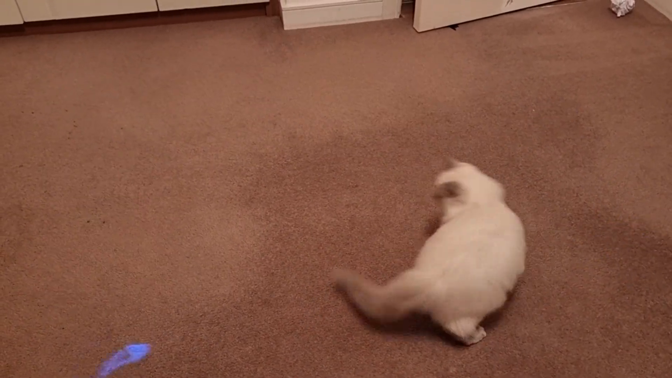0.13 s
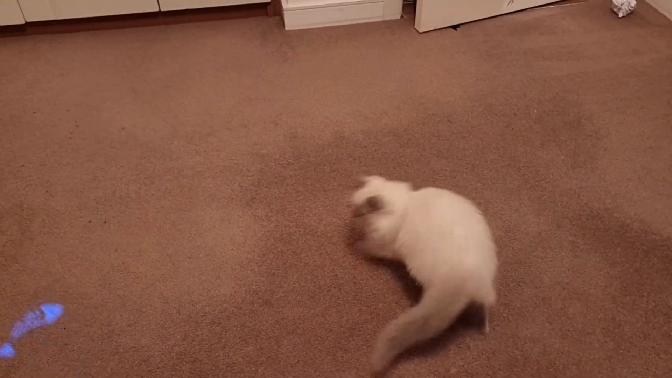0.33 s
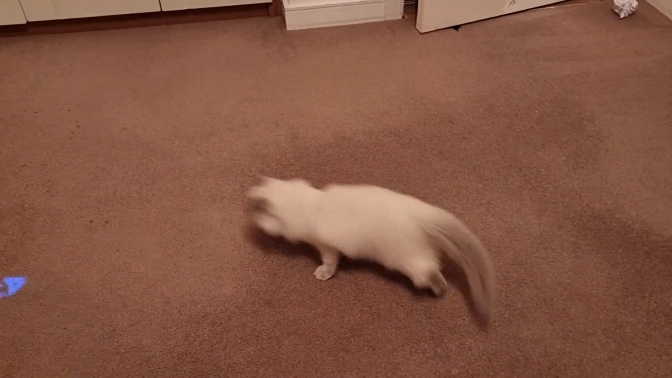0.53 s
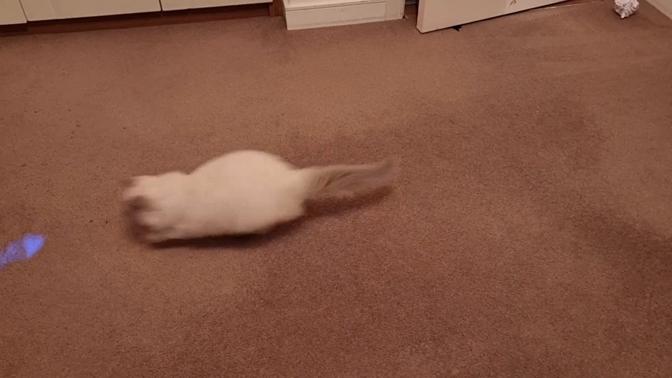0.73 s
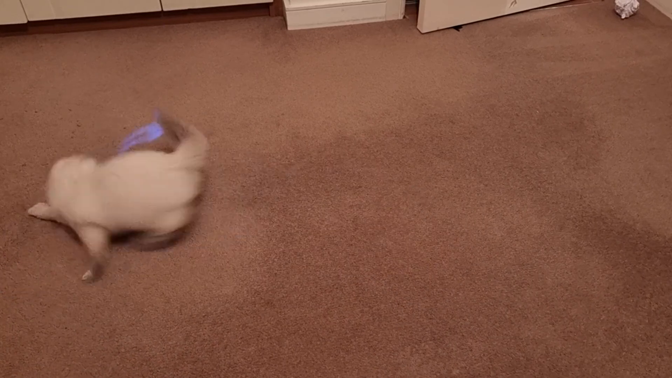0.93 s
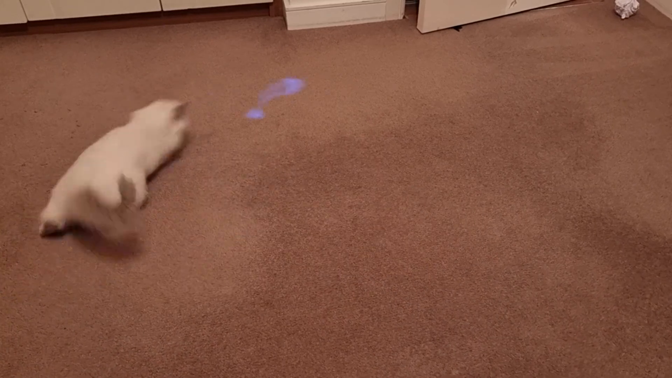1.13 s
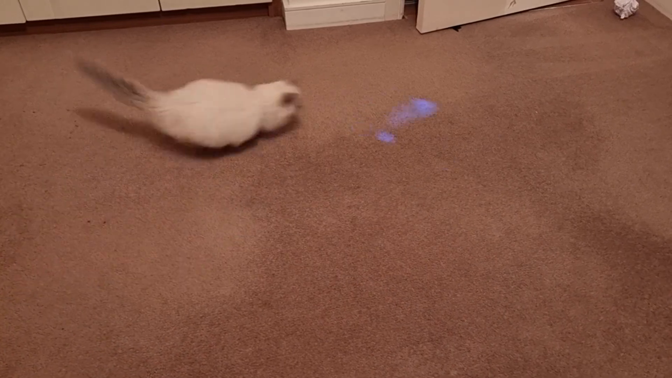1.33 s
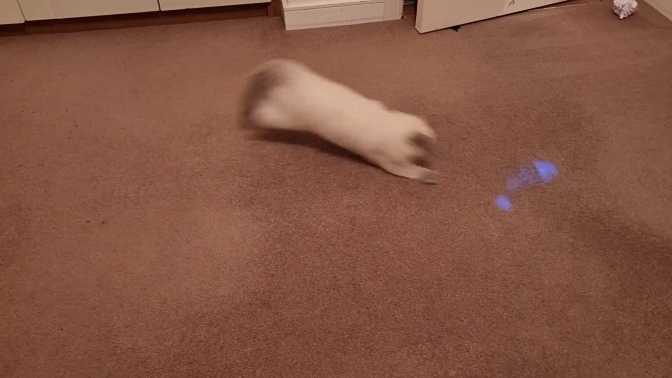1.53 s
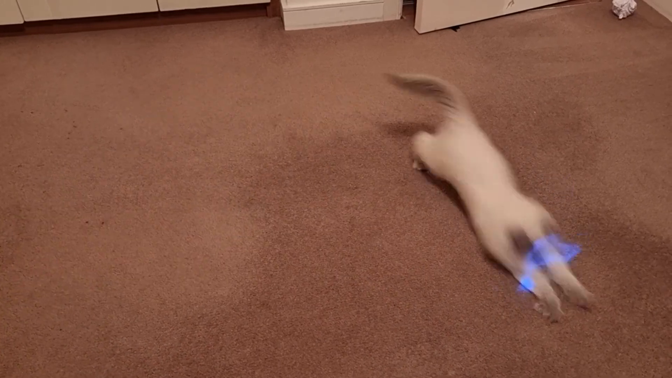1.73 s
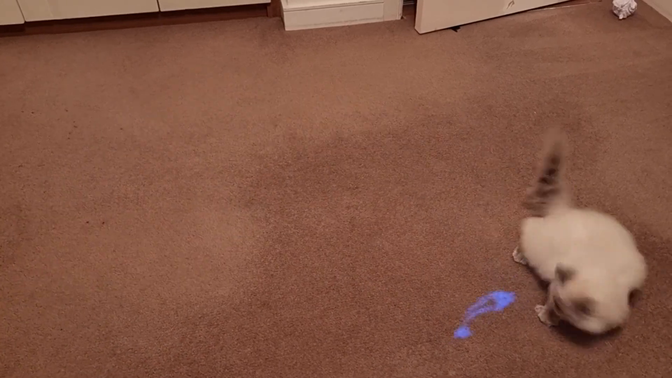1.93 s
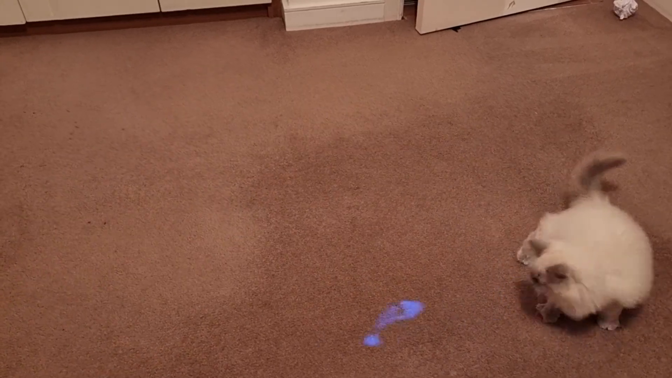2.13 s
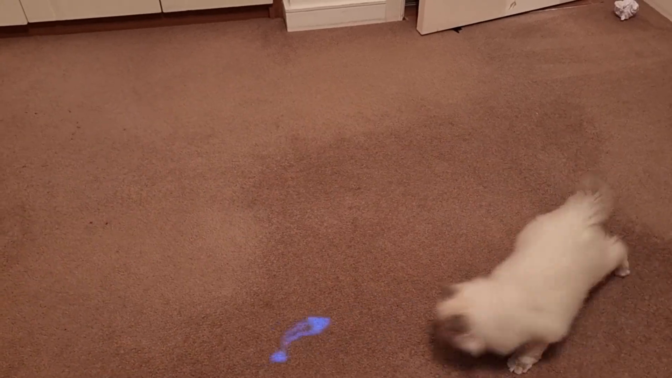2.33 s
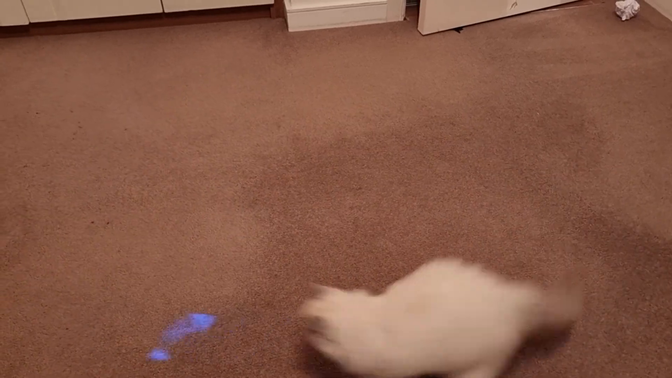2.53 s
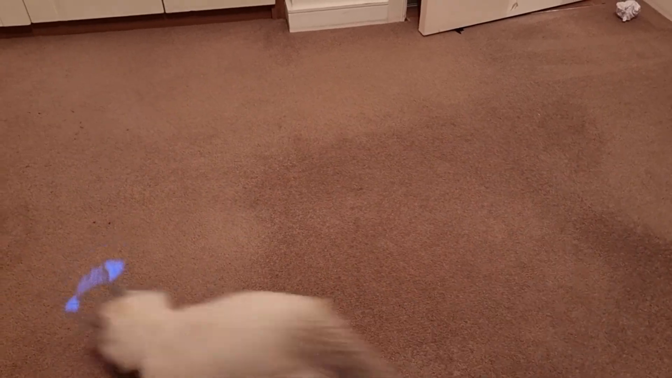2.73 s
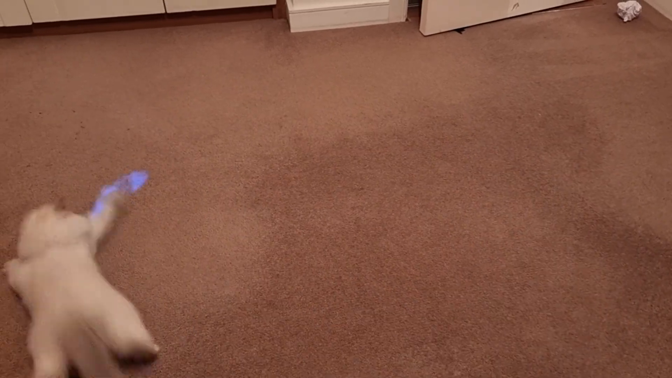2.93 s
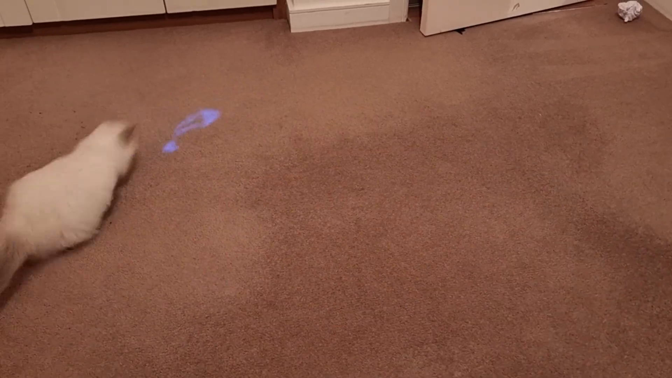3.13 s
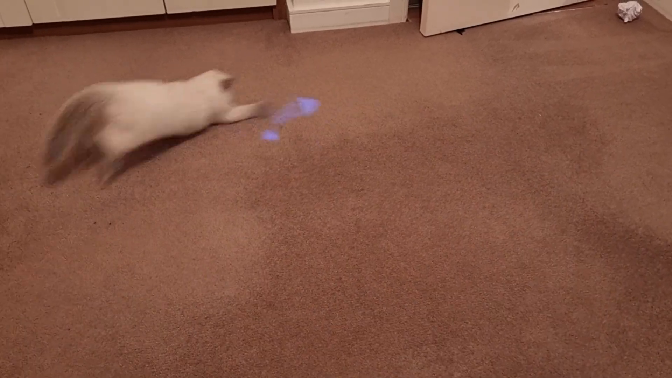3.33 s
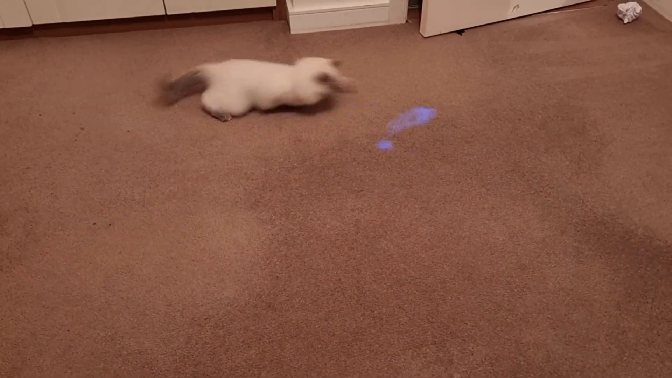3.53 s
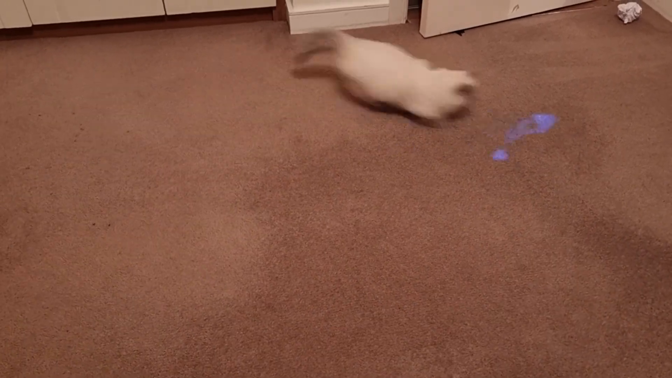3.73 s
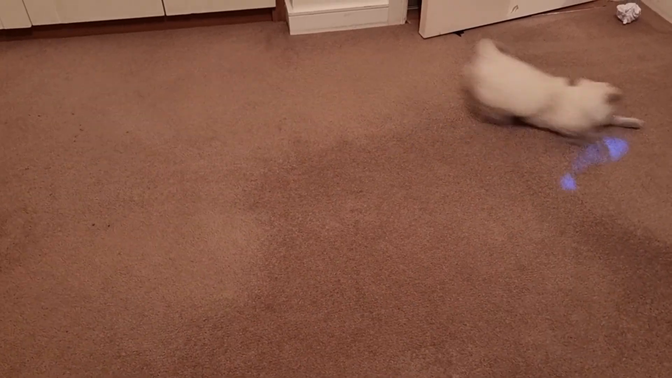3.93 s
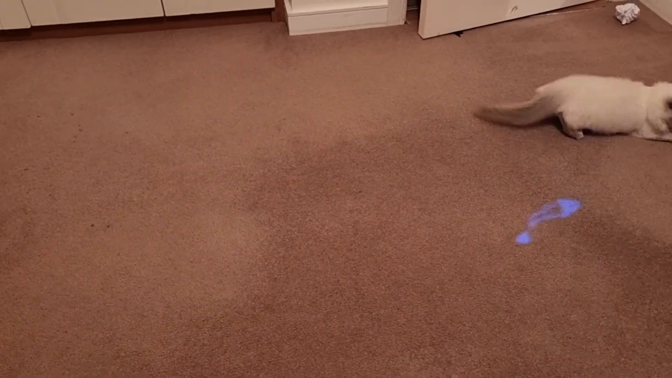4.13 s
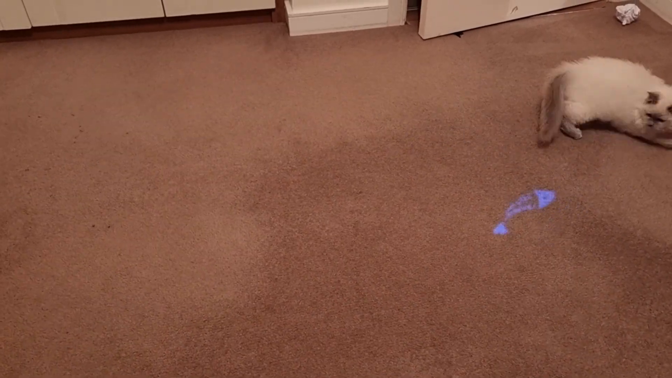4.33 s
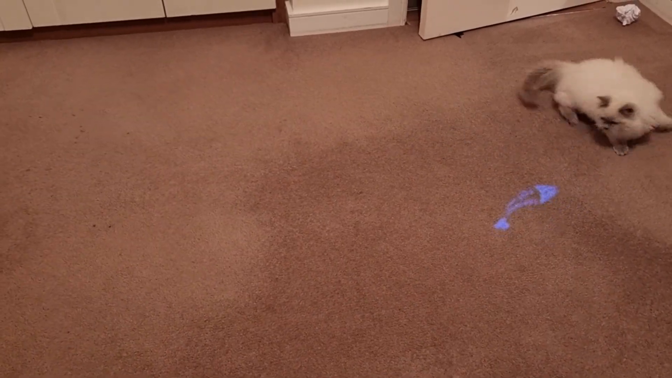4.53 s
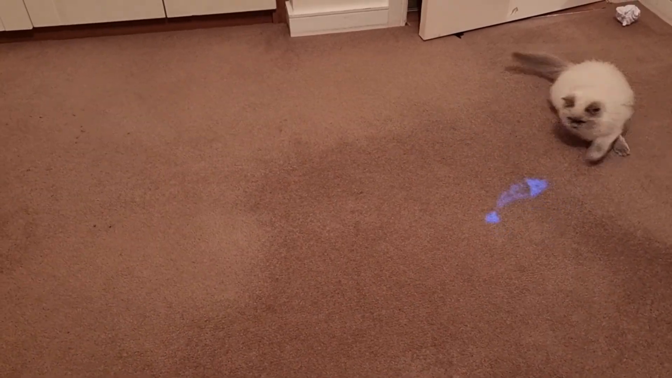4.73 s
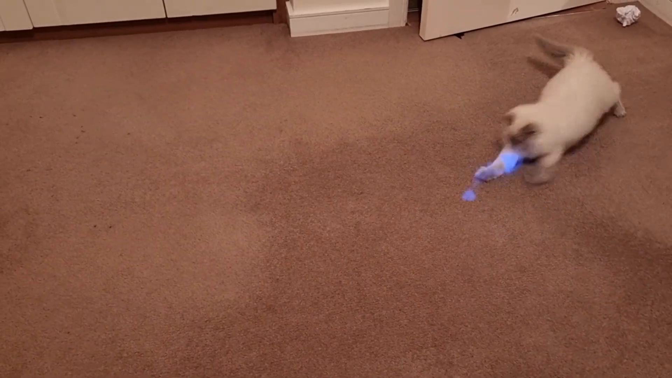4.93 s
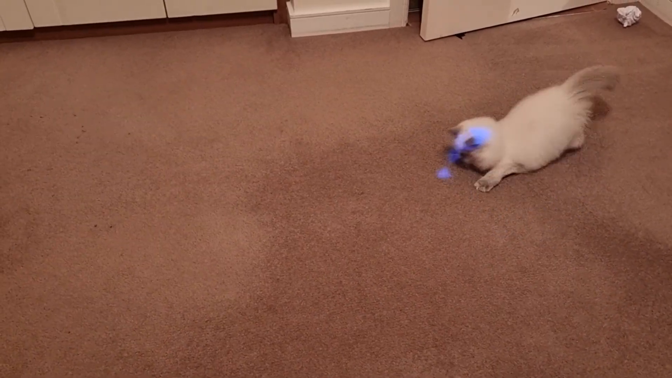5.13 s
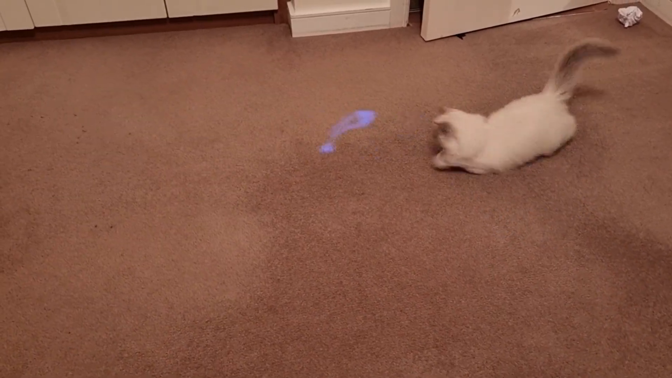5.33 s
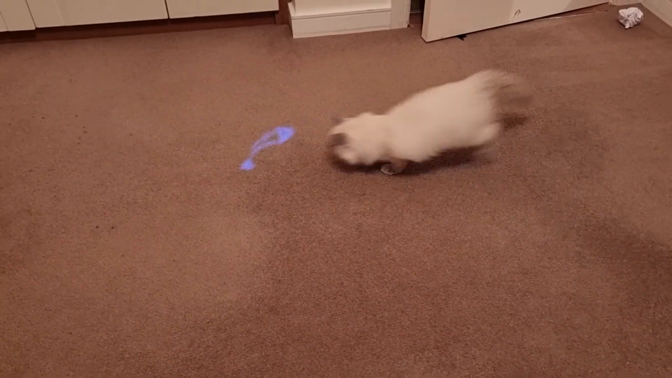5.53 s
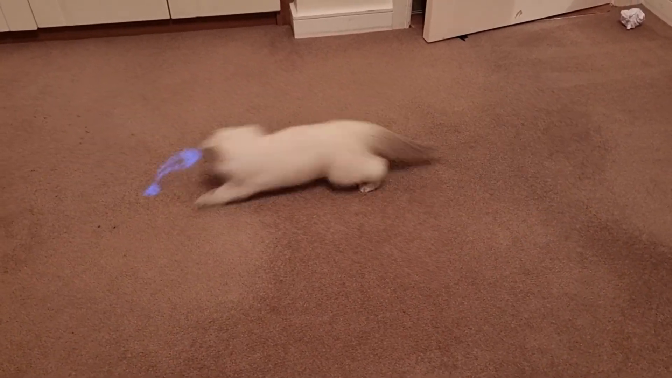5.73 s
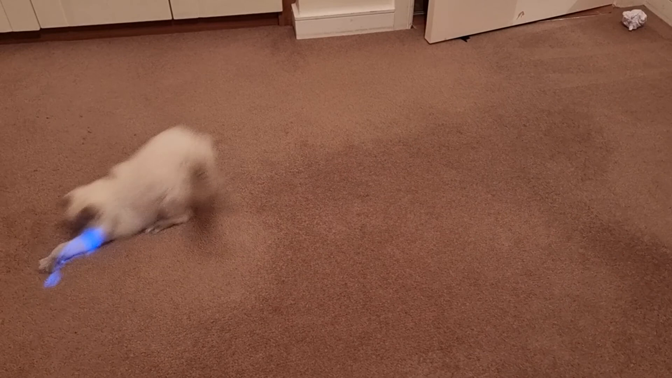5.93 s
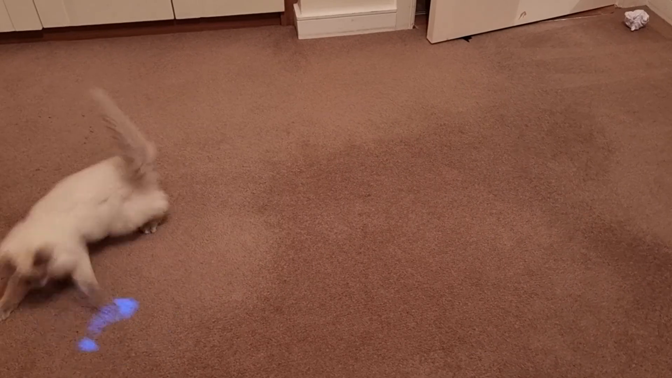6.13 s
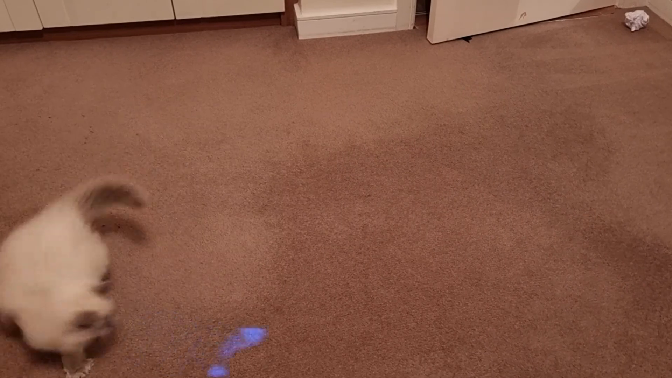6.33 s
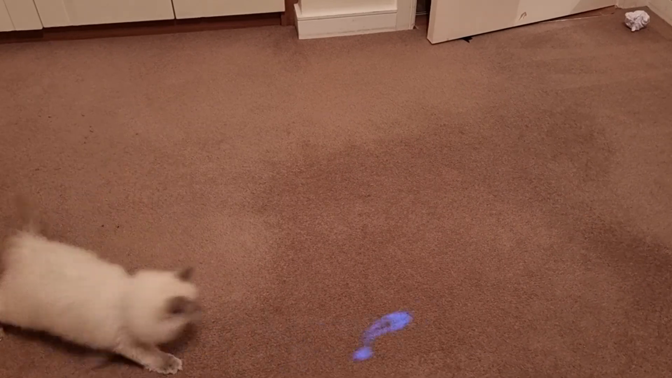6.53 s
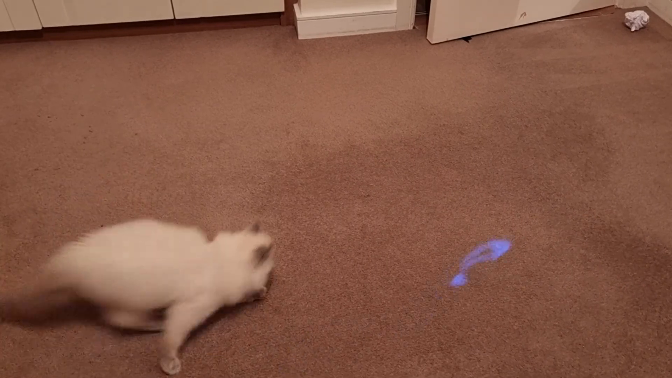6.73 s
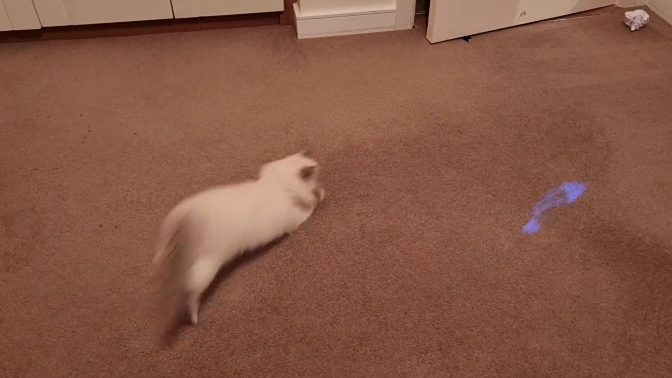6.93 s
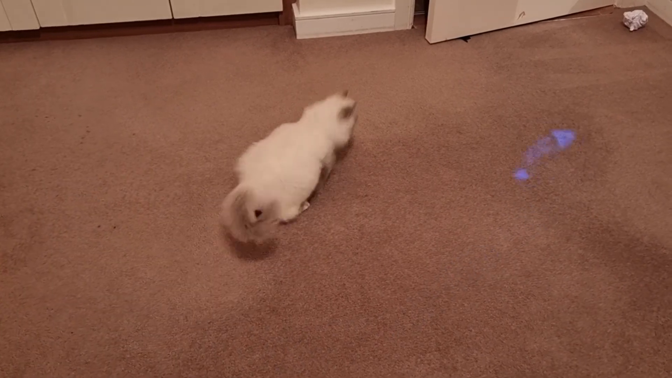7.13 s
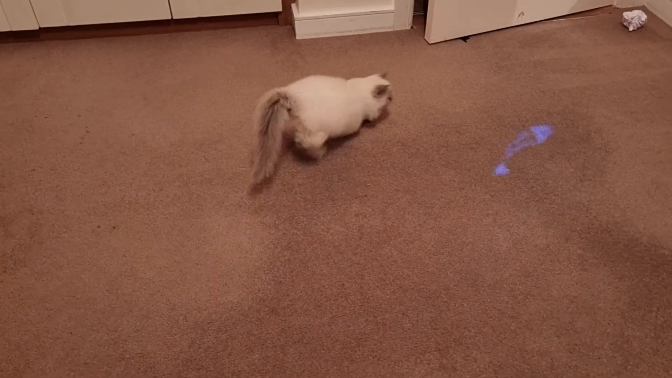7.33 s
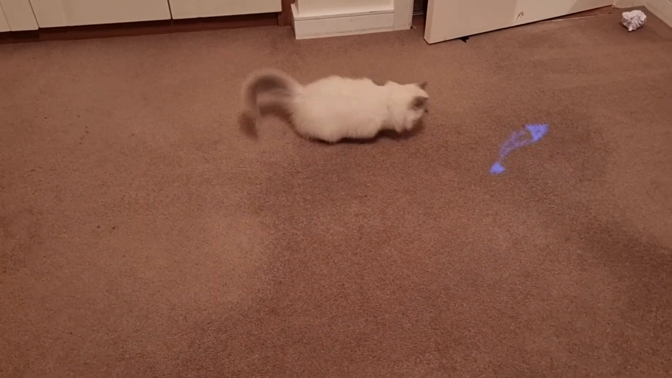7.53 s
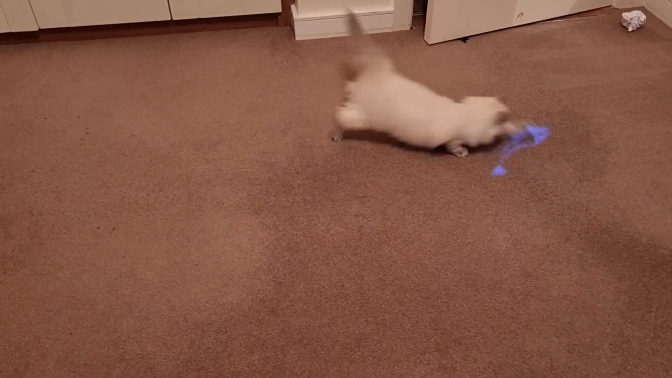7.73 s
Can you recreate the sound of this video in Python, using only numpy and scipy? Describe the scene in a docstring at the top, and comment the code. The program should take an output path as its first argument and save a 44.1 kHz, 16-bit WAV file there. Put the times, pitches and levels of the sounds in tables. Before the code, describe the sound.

A kitten scampers and pounces on a carpeted floor, soft paw thumps and claw snags coming in quick flurries over a steady low hum.

```python
"""A small furnished room with a carpeted wooden floor, where a kitten chases a spot of light.
Its pads thump the boards: short low tones, a ring of floor and room, and a slap of filtered noise.
Its claws snag in the pile as bursts of tiny clicks, and its legs scuff through the fibres as
click noise that swells and fades. A steady hum, still air and faint hiss lie underneath."""
import sys
import numpy as np
from scipy import signal
from scipy.fft import rfft, irfft, next_fast_len
from scipy.io import wavfile

SR = 44100
rng = np.random.default_rng(int(sys.argv[2]) if len(sys.argv) > 2 else 0)


def log_audio(samples):
    """Write samples as a 16-bit WAV file to the path given in sys.argv[1]."""
    # one column per channel
    frames = np.atleast_2d(samples).T
    # limit to full scale, then quantise
    limited = np.clip(frames, -1, 1)
    pcm = np.round(limited * 32767).astype(np.int16)
    wavfile.write(sys.argv[1], SR, pcm)


N = 347067

# Paws landing. Each row: time of full weight in seconds, peak of the thud in dB, pitch of the thud in Hz,
# contact time in seconds (a shared softness scales it), slap of the pad in dB re the peak, before a shared trim.
LANDINGS = [(0.184, -44, 271, 0.0068, -23.5), (0.411, -50.5, 264, .011, -38), (0.479, -50, 312, 0.011, -25),
            (0.592, -46.5, 306, 0.0046, -20), (0.753, -46.5, 310, 0.0082, -9.5),
            (0.795, -35.5, 395, 0.0055, -16), (0.826, -37.5, 310, 0.021, -10.5),
            (0.847, -38, 416, .004, -7.5), (0.873, -26.5, 395, 0.011, -21),
            (0.884, -34.5, 407, 0.015, -17.5), (0.963, -41.5, 360, 0.0096, -11),
            (1.002, -30, 352, 0.0094, -31), (1.026, -37, 303, .013, -29), (1.07, -37.5, 304, 0.014, -29),
            (1.202, -45.5, 367, 0.015, -17), (1.235, -38.5, 298, 0.019, -16.5),
            (1.257, -42.5, 282, 0.0056, -13), (1.305, -44.5, 346, 0.0084, -6), (1.36, -41, 360, 0.013, -11),
            (1.378, -39, 351, 0.027, -12.5), (1.468, -40.5, 310, 0.0074, -25),
            (1.556, -47.5, 276, 0.0049, -22), (1.654, -44.5, 335, 0.022, -11.5),
            (1.733, -28.5, 369, 0.0074, -13.5), (1.772, -41, 292, .016, -24),
            (1.841, -43.5, 416, .006, -7.5), (1.853, -41.5, 415, 0.01, -12), (1.905, -49.5, 346, .016, -25),
            (2.269, -31, 313, .0075, -33), (2.447, -55, 265, 0.007, -33), (2.55, -50.5, 310, 0.004, -23),
            (2.712, -32.5, 260, 0.0073, -39), (2.761, -47, 282, 0.037, -32),
            (2.809, -39.5, 300, 0.013, -17), (2.835, -40, 323, 0.014, -18), (2.866, -30.5, 288, 0.011, -21),
            (2.891, -33.5, 287, .0035, -17.5), (2.928, -35.5, 302, 0.012, -33),
            (2.979, -26, 398, 0.0038, -33), (3.085, -45.5, 335, 0.012, -29), (3.124, -38, 340, 0.0092, -15),
            (3.175, -36.5, 406, 0.008, -18), (3.26, -42, 272, 0.0068, -31), (3.429, -42.5, 339, 0.011, -25),
            (3.478, -37.5, 333, 0.01, -20), (3.611, -37, 220, 0.0098, -20), (3.652, -35, 230, .0045, -38),
            (3.749, -34.5, 335, 0.0019, -33), (3.789, -38.5, 272, 0.0079, -27),
            (3.808, -32, 249, 0.0047, -34), (3.83, -37, 253, 0.0055, -37), (3.886, -25, 340, 0.011, -21),
            (3.903, -26.5, 332, 0.0069, -24), (3.987, -42, 344, 0.019, -20),
            (4.01, -35.5, 306, 0.012, -14.5), (4.086, -57, 320, 0.012, -11), (4.312, -48.5, 287, .013, -11),
            (4.929, -35.5, 335, 0.0063, -17.5), (4.967, -42, 272, 0.011, -24),
            (5.109, -36, 360, 0.0046, -13.5), (5.457, -31, 420, 0.0046, -10.5),
            (5.543, -38.5, 292, 0.0048, -33), (5.567, -47.5, 256, 0.0069, -38),
            (5.651, -53, 224, 0.0089, -33), (5.753, -46.5, 225, .014, -24), (5.793, -39, 366, 0.0047, -7.5),
            (5.814, -28, 317, 0.011, -31), (5.905, -19.5, 387, 0.0069, -25), (5.923, -27, 406, .005, -14),
            (5.967, -25.5, 276, 0.0034, -17), (6.123, -35, 332, 0.0091, -16.5),
            (6.214, -33, 282, 0.021, -24), (6.372, -35.5, 321, 0.013, -42), (6.496, -32, 267, 0.007, -31),
            (6.541, -40, 270, .009, -14), (6.719, -45.5, 327, 0.0021, -12), (6.762, -52.5, 301, .01, -26),
            (6.808, -43.5, 248, 0.011, -26), (6.849, -36, 327, 0.0051, -12.5),
            (6.93, -34, 345, 0.0026, -19), (6.937, -34.5, 384, 0.0033, -21.5),
            (7.095, -44.5, 317, 0.0046, -23), (7.203, -34.5, 276, 0.0083, -28),
            (7.225, -39, 245, .011, -38), (7.558, -36, 410, 0.0028, -16), (7.658, -42, 370, 0.0027, -23),
            (7.759, -37.5, 342, .014, -19.5), (7.779, -45.5, 327, 0.011, -34),
            (7.852, -37.5, 352, 0.0068, -26)]
# Claws plucking the pile. Each row: time in seconds, level in dB, top-end sparkle in dB re that level
# before a shared trim, time in which the fibres let go in seconds.
CLAW_SNAGS = [(0.7124, -59.5, -62, 0.0045), (0.8365, -54.5, -38, 0.0021), (0.959, -59, -16, 0.0018),
              (1.0668, -48, -14, 0.0024), (1.2, -55.5, -26, 0.00078), (1.3028, -47.5, -23, 0.0025),
              (1.31, -57, -16, 0.0018), (1.382, -58, -19, 0.0013), (1.4439, -52, -29, 0.001),
              (1.7288, -57.5, -8, 0.0039), (1.741, -57, -10, .007), (2.8324, -55, -14, 0.0016),
              (2.8627, -58, -17, .003), (3.1732, -53.5, -51, 0.00083), (3.7359, -51.5, -26, 0.0043),
              (3.8249, -55.5, -16, 0.0022), (3.9045, -55, -26, .0027), (4.301, -55, -12, .0022),
              (4.9235, -68, -32, 0.0025), (5.1069, -53.5, -14, 0.00071), (5.449, -50.5, -34, 0.0026),
              (5.454, -56, -14, 0.0033), (5.787, -61, -12, 0.0069), (5.805, -56, -14, .012),
              (5.9051, -55, -8, .002), (5.9365, -50.5, -7, .0075), (5.9546, -54, -17, .0027),
              (6.1079, -51, -19.5, 0.0017), (6.3482, -53.5, -17.5, 0.00042), (6.538, -60, -13, 0.0014),
              (6.8474, -47.5, -28, .001)]
# Legs and fur sliding over the carpet. Each row: fastest moment in seconds, level in dB before a shared trim,
# swell in seconds, fade in seconds; swell and fade each span 20 dB.
SLIDES = [(0.6, -66.5, 0.024, 0.11), (0.714, -62, .004, 0.045), (0.79, -67, .012, .06),
          (0.85, -65, 0.047, 0.25), (1.0, -61, 0.07, 0.11), (1.075, -49.5, 0.045, 0.068),
          (1.198, -58.5, 0.072, .15), (1.312, -51.5, 0.013, .065), (1.378, -54, 0.032, 0.047),
          (1.455, -58.5, .012, 0.19), (1.615, -55.5, .02, 0.087), (1.735, -55, .008, 0.14),
          (1.88, -60.5, .12, 0.16), (2.29, -67, .03, 0.054), (2.72, -58, 0.0094, 0.089),
          (2.775, -59, .03, 0.053), (2.85, -55.5, 0.12, 0.33), (2.98, -56, 0.015, 0.039),
          (3.09, -57, .015, 0.075), (3.3, -57.5, 0.056, 0.054), (3.42, -55, 0.23, 0.18),
          (3.665, -55.5, .1, 0.036), (3.74, -54.5, .008, .11), (3.83, -53, .07, 0.11),
          (3.905, -55, 0.049, 0.079), (4.03, -50, 0.13, 0.073), (4.308, -59, .015, .05),
          (5.108, -57, 0.091, .04), (5.19, -60, 0.025, 0.033), (5.455, -53, 0.0094, 0.017),
          (5.81, -49, 0.069, 0.046), (5.905, -53, .008, 0.12), (5.955, -48.5, 0.067, 0.057),
          (6.11, -53, 0.042, 0.096), (6.355, -50, 0.012, 0.035), (6.54, -67, 0.037, 0.037),
          (6.85, -54, 0.059, 0.059), (7.22, -61.5, 0.074, 0.16), (7.553, -62, .006, 0.015),
          (7.765, -66, 0.07, .25)]
# Dashes across the room, with the other feet pattering. Each row: start in seconds, end in seconds.
DASHES = [(0.9, 1.7), (2.75, 4.05)]
# Resonances of the floorboards under the carpet. Each row: pitch in Hz, width in Hz, level in dB.
BOARD_RESONANCES = [(149, 39, -5), (216.5, 27.4, 2), (282, 39.5, 0.5), (335, 29, -4), (395, 13.5, -3.5),
                    (445.5, 24, -1.5), (533.7, 45, -3), (730, 36, -9.5), (833, 40, 4.5), (946, 32, -1)]
# Tone colour of a pad slapping the carpet. Each row: frequency in Hz, relative level in dB.
SLAP_COLOUR = [(250, -0.5), (450, -15), (560, -12), (640, 2.5), (800, 5), (900, -10.5), (1020, -1),
               (1400, -13), (2500, -40)]
# Tone colour of a loop of pile snapping free. Each row: frequency in Hz, relative level in dB.
SNAG_COLOUR = [(700, -34.5), (1200, 13), (1600, 7.5), (2700, 14), (4000, 2.5), (5500, -7.5), (8000, -29.5),
               (15000, -79)]
# Tone colour of the jerked carpet backing. Each row: frequency in Hz, relative level in dB.
TUG_COLOUR = [(130, -38), (280, 8.5), (450, 15), (650, 4), (1100, 5), (1600, 1), (3000, -55)]
# Tone colour of the finest fibres. Each row: frequency in Hz, relative level in dB.
SPARKLE_COLOUR = [(3500, -68), (7500, 16), (10500, 5), (15000, 5)]
# Tone colour of rubbed carpet pile. Each row: frequency in Hz, relative level in dB.
PILE_COLOUR = [(120, -23.5), (300, 10.5), (700, 4), (1100, 1.5), (1500, 0), (2700, 2), (4000, -8),
               (5500, -19.5), (8000, -24.5), (10500, -32), (15000, -29.5)]
# Tone colour of the still room air. Each row: frequency in Hz, relative level in dB.
AIR_COLOUR = [(25, -13), (55, -1), (110, 8.5), (190, 1), (300, 0.5), (450, -5.5), (620, -12), (1000, -9),
              (1400, -20.5), (3000, -48)]
# Tone colour of the microphone hiss. Each row: frequency in Hz, relative level in dB.
HISS_COLOUR = [(900, -34), (1400, -4.5), (1800, 2.5), (2600, 1.5), (3800, 1), (4700, -12.5), (5700, -12),
               (6800, -5.5), (8200, -16.5), (9000, -9), (10000, -27), (13000, -20), (15500, -22.5)]
# Partials of the hum. Each row: multiple of HUM_HZ, rms level in dB before it wavers.
HUM_PARTIALS = [(1, -62.5), (2, -80.5), (3, -86)]
# Gain of the slightly duller left microphone. Each row: frequency in Hz, gain in dB.
LEFT_MICROPHONE = [(100, -.7), (600, -.6), (1400, -3.6), (2700, -5), (5000, -1.6), (9000, -1.8),
                   (14000, -2.8)]

HUM_HZ, TOP_HZ = 100.13, 15600
# a heavier landing puts more of its force into the thud and less into the after-ring
USUAL_PAW_DB, USUAL_PAW_HZ = -38, 330
AFTER_RING_DB, AFTER_RING_DB_PER_DB = -12, -0.19
# a claw that catches deep in the pile sparkles less and tugs the backing more
USUAL_SPARKLE_DB = -20
BACKING_TUG_DB, BACKING_TUG_DB_PER_DB = -12, -0.3
PULL_S = 0.008  # how quickly the strain on a loop of pile builds before it snaps
# light steps during the dashes
PATTER_PER_S, PATTER_DB, PATTER_SPREAD_DB, PATTER_CONTACT_S, PATTER_SLAP_DB = 14, -49, 0.5, 0.011, -19.5
# every slap brushes the pile and every claw drags through it: level re the slap or claw, swell and fade
BRUSH_DB, BRUSH_SWELL_S, BRUSH_FADE_S = -7.5, 0.017, 0.041
DRAG_DB, DRAG_SWELL_S, DRAG_FADE_S = -8.5, 0.0092, 0.037
TEAR_DB = -52  # the harder the rubbing beside this level, the more it rips at the fine fibres


def paws(softness=0.23, ring_t60=0.21, ring_delay=0.0048, kick_s=0.00072, slap_trim_db=-5, smack=0.6,
         slap_t60=0.14, phase_spread=0.44, toe_lead_s=0.0073, toe_db=-12):
    """A soft pad loads the floor for a few cycles and slaps the carpet; boards and room ring on."""
    out = np.zeros((2, N))
    lead = SR // 70  # samples before full weight
    t = np.arange(-lead, SR // 6) / SR
    ring_shape = np.clip(t / ring_delay + 0.37, 0, 1) * undb(-60 * t / ring_t60)
    pat = np.where(t < 0, np.exp(-abs(t) / 0.006), undb(-60 * t / slap_t60))
    early = slice(lead + SR // 160, lead + SR // 25)  # where the ring's level is set
    # every spot on the floor reaches the microphones by its own set of paths
    floor_paths = boards(diffuse(2 * SR))
    pad_paths = unit(colour(diffuse(2 * SR), SLAP_COLOUR))

    for s, db, hz, contact, pad_db in list(LANDINGS) + patter():
        spot = rng.integers(2 * SR - len(t)) + np.arange(len(t))
        # the toes touch first, then the full weight comes down
        press_s = softness * contact
        weight = 1 / np.cosh(np.clip(t / press_s, -40, 40))
        toes = undb(toe_db) / np.cosh(np.clip((t + toe_lead_s) / press_s, -40, 40))
        phase = 2 * np.pi * (hz * t + rng.random()) + phase_spread * rng.standard_normal((2, 1))
        thud = weight * np.sin(phase) + toes * np.sin(phase + 2 * np.pi * rng.random())
        # a short kick at the thud's pitch sets the boards ringing
        kick = np.cos(2 * np.pi * hz * t[:2 * lead]) / np.cosh(t[:2 * lead] / kick_s)
        ring = signal.fftconvolve(floor_paths[:, spot], kick[None], "same", axes=1) * ring_shape
        after_db = AFTER_RING_DB + AFTER_RING_DB_PER_DB * (db - USUAL_PAW_DB)
        ring *= undb(after_db) / np.sqrt(2 * np.mean(ring[:, early] ** 2))
        slap = pad_paths[:, spot] * (pat + smack * weight) * undb(pad_db + slap_trim_db)
        add(out, s - lead / SR, undb(db) * (thud + ring + slap))
    return out


def patter():
    """Light steps at a loose, quick pace during each dash; rows like those of the landings."""
    times = np.concatenate([np.arange(start, end, 1 / PATTER_PER_S) for start, end in DASHES])
    steps = []
    for s, (late, force, sharp) in zip(times, rng.standard_normal((100, 3))):
        step_s = s + 0.25 * late / PATTER_PER_S
        step_db = PATTER_DB + PATTER_SPREAD_DB * force
        step_hz = USUAL_PAW_HZ * 2 ** (0.23 * sharp)
        steps.append((step_s, step_db, step_hz, PATTER_CONTACT_S, PATTER_SLAP_DB))
    return steps


def boards(x):
    """The floor answers at its broad resonances, added with alternating sign."""
    total = 0
    for k, (hz, width, db) in enumerate(BOARD_RESONANCES):
        peak = signal.iirpeak(hz, hz / width, fs=SR)
        total = total + (-1) ** k * undb(db) * signal.lfilter(*peak, x)
    return total


def claws(snag_db=-10, sparkle_trim_db=-10, snap=2.1, pull_db=-17):
    """A claw stretches a loop of the pile until it snaps free; weaker fibres crackle around the snap."""
    out = np.zeros((2, N))
    lead = SR // 40  # samples before the snap
    t = np.arange(-lead, SR // 24) / SR
    for s, db, top_db, release in CLAW_SNAGS:
        pull = undb(pull_db) * np.exp(-abs(t / PULL_S))
        strain = np.where(t < 0, pull, np.exp(-abs(t / release)))
        crackle = fibres(3500, 1.8, len(t)) * strain
        # the snap reaches the two microphones up to 12 samples apart
        crack = snap * np.array([t == 0, np.roll(t == 0, rng.integers(-12, 13))])
        snaps = crack + near_paths(crackle, smear=0.0004)
        snag = unit(colour(snaps, SNAG_COLOUR)) * undb(snag_db)
        # the snap jerks the carpet backing; the fine fibres carry the top end
        tug_db = BACKING_TUG_DB + BACKING_TUG_DB_PER_DB * (top_db - USUAL_SPARKLE_DB)
        tug = unit(colour(snaps, TUG_COLOUR)) * undb(tug_db)
        sparkle = unit(colour(snaps, SPARKLE_COLOUR)) * undb(top_db + sparkle_trim_db)
        add(out, s - lead / SR, undb(db) * (snag + tug + sparkle))
    left_right_gain = undb([[-1.2], [0.8]])
    return room(out, t60=0.18, wet_db=-4.5) * left_right_gain


def scuffs(grains_per_s=1200, spread_db=4.5, scuff_trim_db=-4.5, patchy_db=1.5, tear_trim_db=-27):
    """Fibres flick past the moving paws in quick uneven catches; harder rubbing adds more tearing fizz."""
    effort = rubbing()
    catches = fibres(grains_per_s, spread_db, N) * undb(patchy_db * walk(90))
    flicks = near_paths(catches, smear=0.0019)
    tearing = np.minimum(effort / undb(TEAR_DB), 2)
    fizz = unit(colour(flicks, SPARKLE_COLOUR)) * undb(tear_trim_db) * tearing
    rustle = unit(colour(flicks, PILE_COLOUR)) + fizz
    return room(rustle * effort * undb(scuff_trim_db), t60=0.11, wet_db=4.0)


def rubbing():
    """How hard the kitten rubs the carpet: each slide, brush and drag swells and fades."""
    brushes = [(s, db + slap_db + BRUSH_DB, BRUSH_SWELL_S, BRUSH_FADE_S) for s, db, _, _, slap_db in LANDINGS]
    drags = [(s, db + DRAG_DB, DRAG_SWELL_S, DRAG_FADE_S) for s, db, _, _ in CLAW_SNAGS]
    power = np.zeros(N)
    for s, db, swell, fade in list(SLIDES) + brushes + drags:
        start = max(s - 2 * swell, 0)
        t = np.arange(start - s, 2 * fade, 1 / SR)
        level_db = db - 20 * np.maximum(-t / swell, t / fade)
        add(power, start, undb(level_db) ** 2)
    return np.sqrt(power)


def fibres(rate, spread_db, count):
    """Fibres let go as tiny clicks at random moments, most of them small."""
    clicks = (rng.random(count) < rate / SR) * rng.choice([-1, 1], count)
    return clicks * undb(spread_db * np.minimum(rng.exponential(size=count), 4))


def near_paths(x, smear, size=1024):
    """Nearby reflections colour every 23 ms of movement anew, differently at each microphone."""
    pieces = np.pad(x, (0, -len(x) % size)).reshape(-1, size)
    paths = diffuse(pieces.size).reshape(2, -1, size) * np.exp(-np.arange(size) / SR / smear)
    paths /= np.sqrt(np.sum(paths ** 2, axis=2, keepdims=True))
    return irfft(rfft(pieces) * rfft(paths)).reshape(2, -1)[:, :len(x)]


def room(x, t60, wet_db):
    """Direct sound plus the short diffuse ring of a furnished room; (channels, time)."""
    t = np.arange(SR // 4) / SR
    tail = diffuse(len(t)) * undb(-60 * t / t60)
    response = tail * undb(wet_db) / np.sqrt(np.sum(tail ** 2) / 2)
    response[:, 0] += 1  # the direct sound
    return signal.fftconvolve(np.atleast_2d(x), response, axes=1)[:, :x.shape[-1]]


def background(air_db=-70.0, hiss_db=-73.5, waver_db=0.7):
    """An appliance hums at twice the mains rate over still room air and microphone hiss."""
    t = np.arange(N) / SR
    hum = np.zeros(N)
    for k, db in HUM_PARTIALS:
        hum += np.sqrt(2) * undb(db) * np.sin(2 * np.pi * (k * HUM_HZ * t + rng.random()))
    air = unit(colour(diffuse(N), AIR_COLOUR, size=8192)) * undb(air_db)
    hiss = unit(colour(rng.standard_normal((2, N)), HISS_COLOUR)) * undb(hiss_db)
    return hum * undb(waver_db * walk(16.0)) + air + hiss


def walk(rate):
    """Chance unevenness: a new random level `rate` times a second, joined by straight lines."""
    return np.interp(np.arange(N) / SR * rate, np.arange(N // 100), rng.standard_normal(N // 100))


def diffuse(count, apart_hz=750):
    """Noise from all around at two microphones: alike in the bass, unrelated in the treble."""
    size = next_fast_len(count, True)
    mid, side = rfft(rng.standard_normal((2, size)))
    hz = np.arange(len(mid)) * SR / size
    alike = 0.97 / (1 + (hz / apart_hz) ** 3)
    mid, side = mid * np.sqrt(1 + alike), side * np.sqrt(1 - alike)
    return irfft(np.array([mid + side, mid - side]), size)[:, :count] / np.sqrt(2)


def colour(x, points, size=2048):
    """Filter through (Hz, dB) points that never sounds ahead of its input, from the log gain's cepstrum."""
    hz, db = np.transpose(points)
    grid = np.maximum(np.arange(size // 2 + 1) * SR / size, 1)
    cepstrum = irfft(np.log(undb(np.interp(np.log(grid), np.log(hz), db))))
    # folding the second half onto the first puts the response after time zero
    cepstrum[1:size // 2] *= 2
    cepstrum[size // 2 + 1:] = 0
    response = irfft(np.exp(rfft(cepstrum)))
    return signal.fftconvolve(np.atleast_2d(x), response[None], axes=1)[:, :x.shape[-1]]


def undb(db):
    """Decibels to gain."""
    return 10 ** (np.asarray(db) / 20)


def unit(x):
    """Scale to rms 1."""
    return x / np.sqrt(np.mean(x ** 2))


def add(track, s, sound):
    """Mix a sound into a track at time s in seconds."""
    start = max(int(s * SR), 0)
    part = sound[..., :N - start]
    track[..., start:start + part.shape[-1]] += part


def scene():
    """The kitten in the humming room; so light a body hardly moves the floor in the deep bass."""
    kitten = paws() + claws() + scuffs()
    bass_cut = signal.butter(3, 125, "high", fs=SR, output="sos")
    return signal.sosfilt(bass_cut, kitten) + background()


def record(dry):
    """The left microphone is a little duller than the right; a steep filter cuts the top of both."""
    microphones = np.vstack([colour(dry[0], LEFT_MICROPHONE), dry[1]])
    top_cut = signal.ellip(10, 0.2, 70, TOP_HZ, fs=SR, output="sos")
    return signal.sosfilt(top_cut, microphones)


dry = scene()
out = record(dry)
log_audio(out)
```